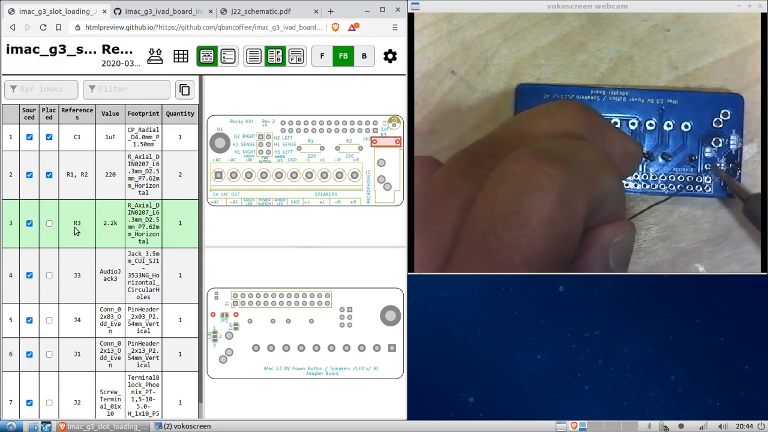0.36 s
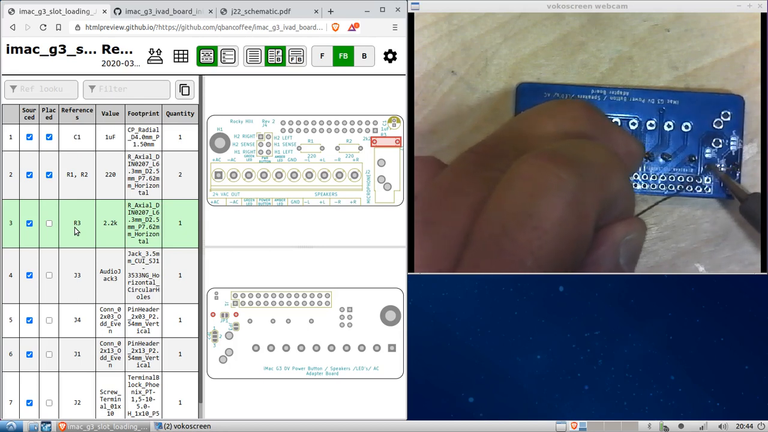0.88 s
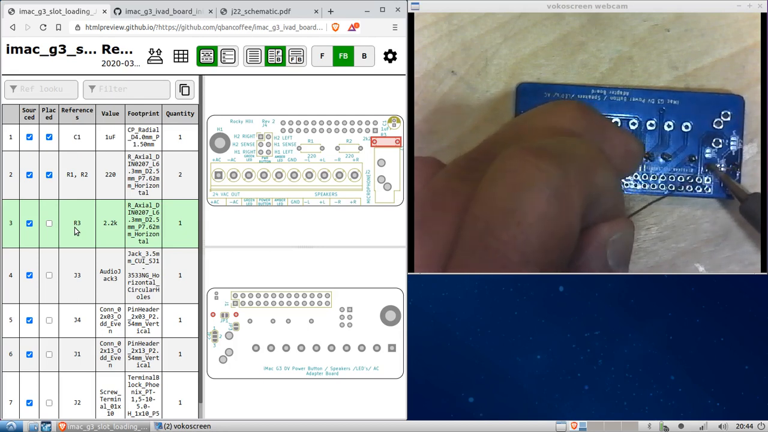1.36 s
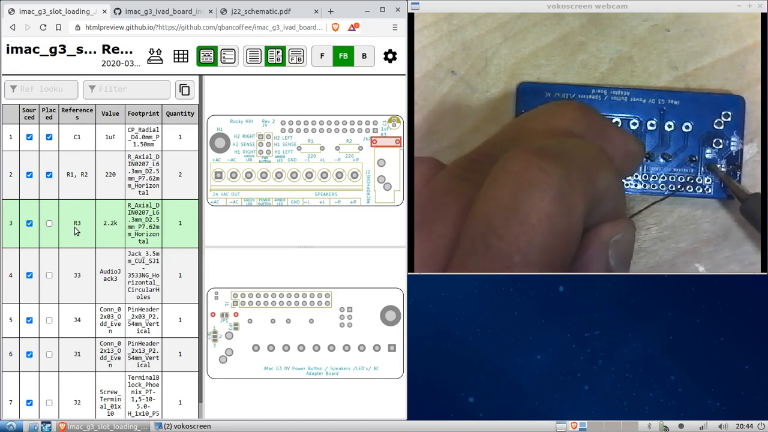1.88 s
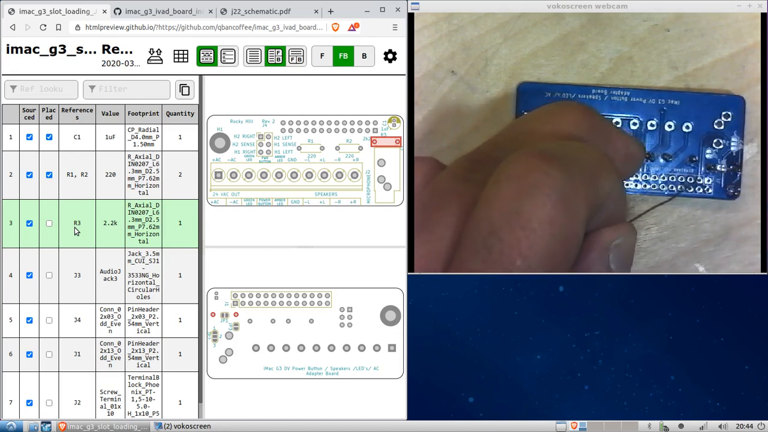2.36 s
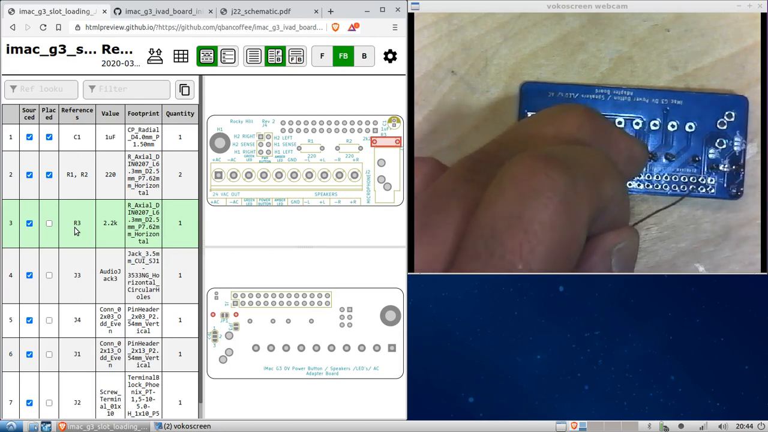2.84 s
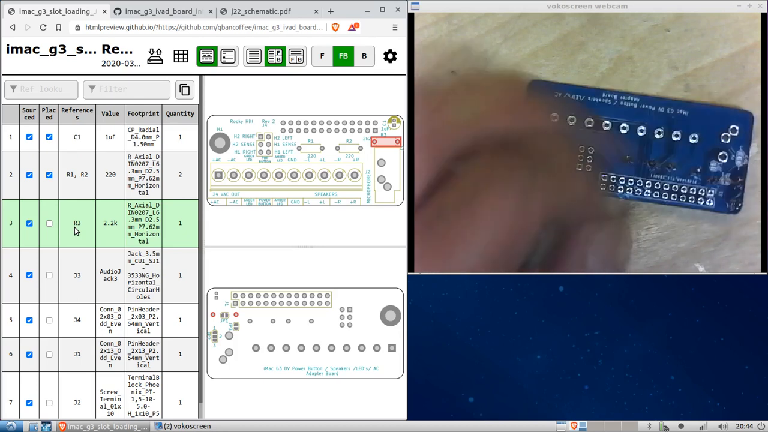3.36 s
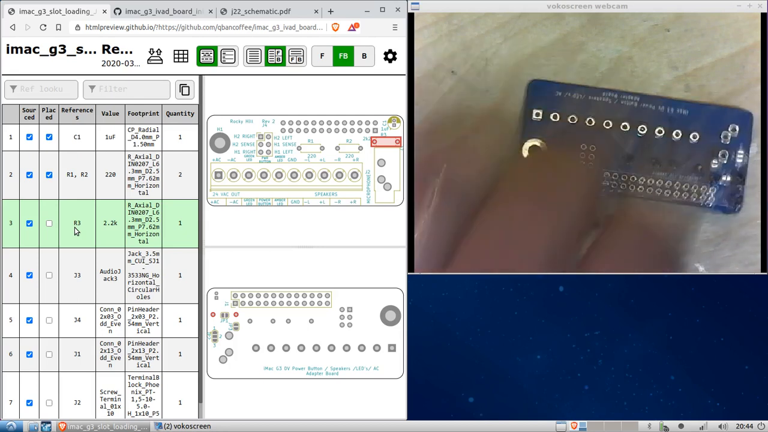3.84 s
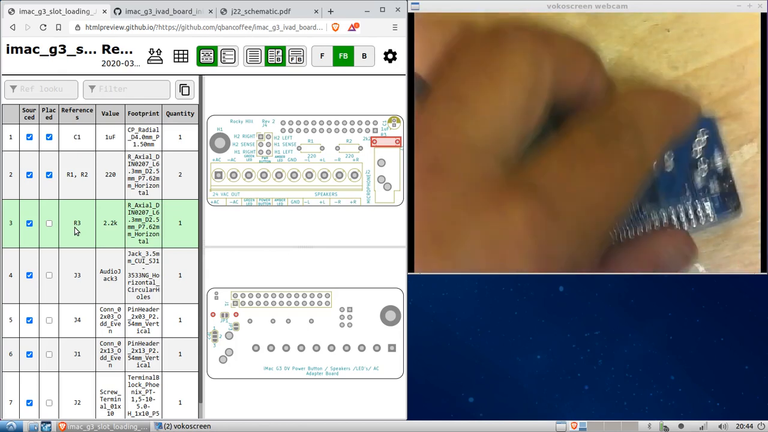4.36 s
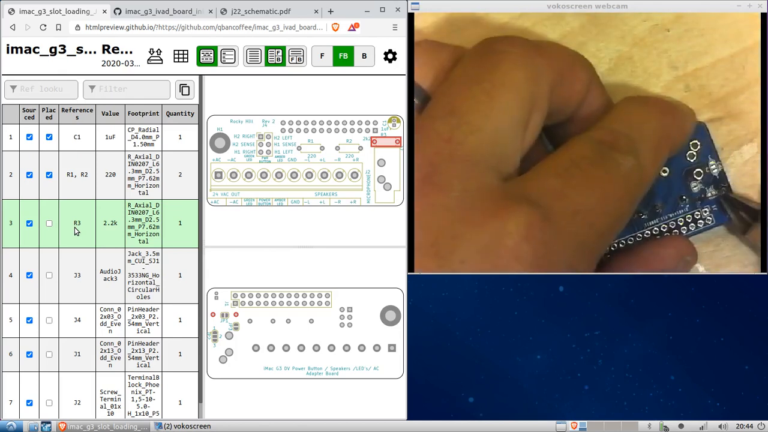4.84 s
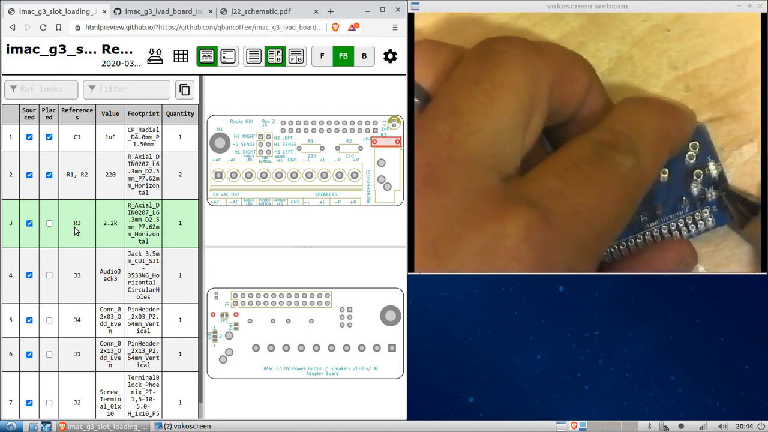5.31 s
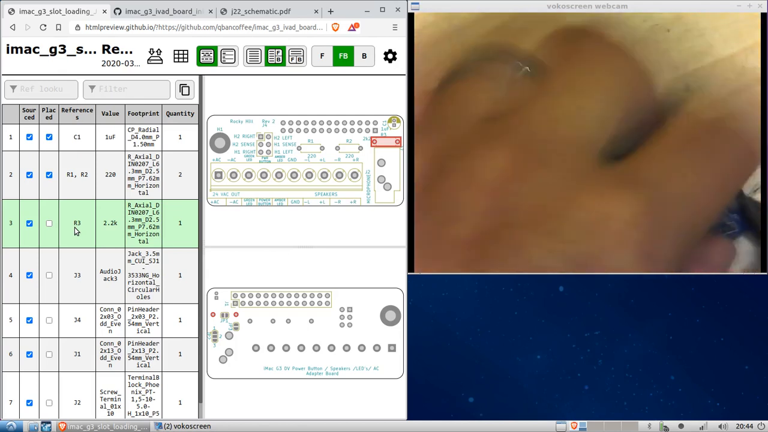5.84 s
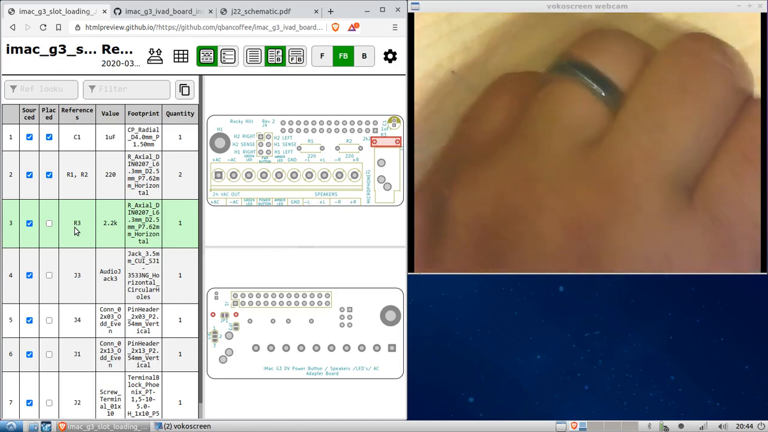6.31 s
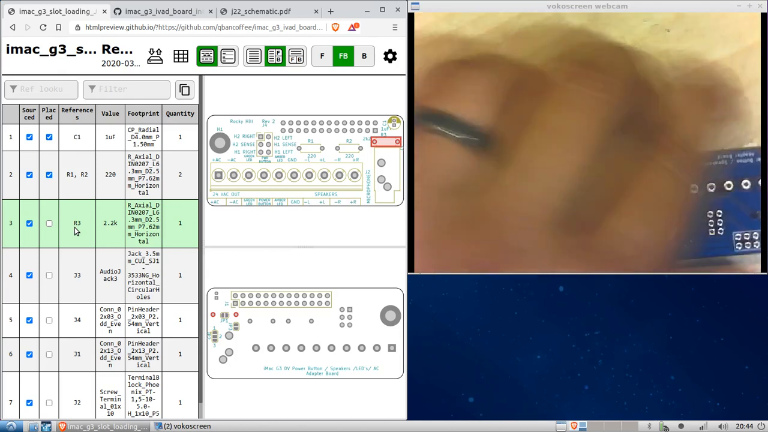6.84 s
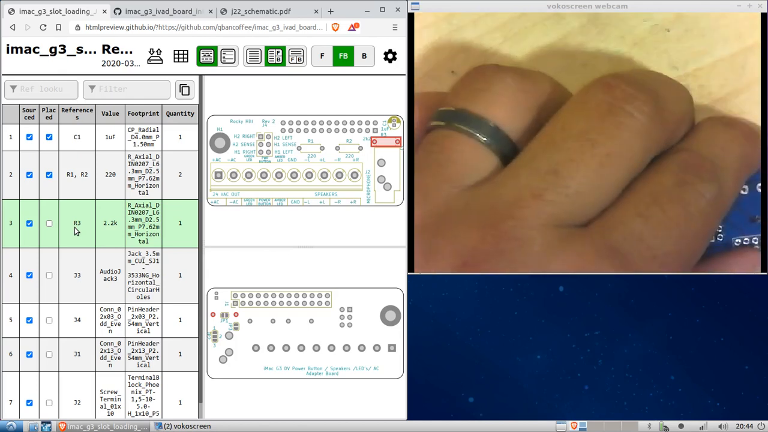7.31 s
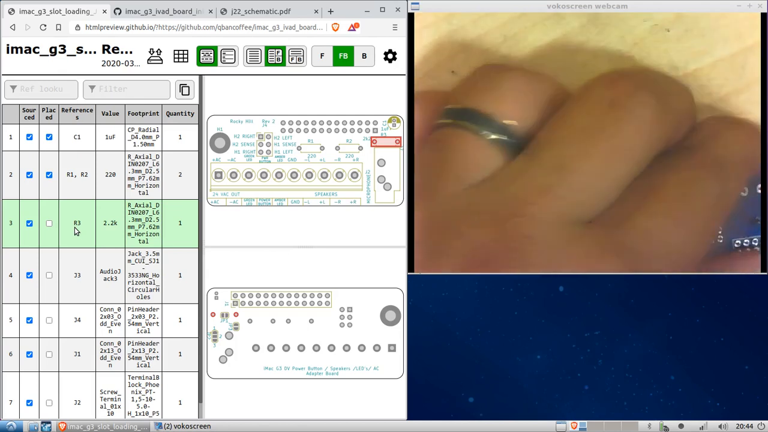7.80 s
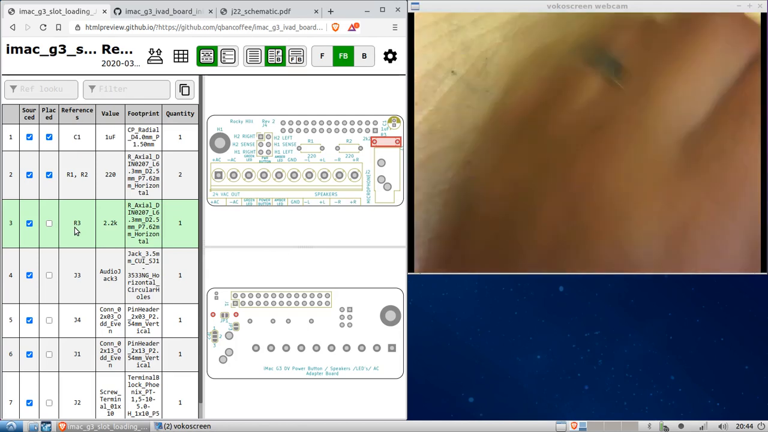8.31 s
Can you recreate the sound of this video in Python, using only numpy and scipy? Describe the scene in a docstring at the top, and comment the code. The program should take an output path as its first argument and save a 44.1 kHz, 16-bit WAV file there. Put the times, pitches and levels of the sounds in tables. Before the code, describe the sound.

Close up at a wooden workbench, small cutters trim leads from a circuit board. Mostly quiet hum and fan hiss, broken by a fast rattle of hard snaps and board knocks, a bright tick, and low bumps from the hands. Later come isolated sharp snips, a short ringing flurry, light rubbing and another crack. Dry small room, bright close microphones that clip on peaks.

```python
"""Small steel cutters snip wire leads on a circuit board: each contact is a burst of noise with knocks and thuds.
Short decaying tones make the clicks of the tips; swelling noise makes hands push and turn the board
on a wooden bench. Steady tones and noise make a mains hum and a fan; very low noise makes the bench sway.
The room is small. Two close microphones ring near 10 kHz and clip on the loudest snips."""
import sys
import numpy as np
from scipy import signal
from scipy.fft import rfft, irfft, next_fast_len
from scipy.io import wavfile
from scipy.ndimage import map_coordinates

SR = 44100
rng = np.random.default_rng(int(sys.argv[2]) if len(sys.argv) > 2 else 0)


def pcm_store(signal):
    """Save signal as 16-bit PCM."""
    levels = np.round(np.clip(np.atleast_2d(signal), -1, 1) * 32767)
    wavfile.write(sys.argv[1], SR, levels.astype(np.int16).T)


def level_to_linear(level):
    """Convert decibel levels to linear amplitude factors, elementwise."""
    exponent = np.asarray(level, float) / 20
    return 10 ** exponent


N = 371763  # length of the scene [samples]

# Slow rocking of the bench on its legs: (centre [Hz], width [Hz], relative level [dB])
SWAY_MODES = [(5.4, 0.24, -0.5), (9.7, 0.24, -13), (14.5, 2.1, -14)]
# Mains hum whose load switches on and off: (level on [dB], level off [dB], cycle [s], first switch-off [s])
HUM_LOAD = (-31.6, -34.8, 2.62, .37)
# Steady tones of the fan: (frequency [Hz], level [dB])
FAN_TONES = [(57.3, -68.5), (60, -50), (457, -58.5), (571, -59), (823, -59), (1012, -63.5), (1238, -65),
             (1519, -61), (4834, -78)]
# Colour of the fan noise: (frequency [Hz], relative level [dB])
FAN_AIR = [(15, -120), (25, 2), (50, -20.5), (100, -9), (200, -21), (350, -23.5), (600, -19.5), (1500, -25),
           (2500, -30), (6000, -33), (16000, -36.5)]
# How alike the fan noise is at left and right: (frequency [Hz], likeness [1 = same])
FAN_LIKENESS = [(60, 0.83), (250, 0.6), (600, 0.033), (1500, 0.36), (4000, 0.15), (12000, 0.27)]
# The same for things on the bench: (frequency [Hz], likeness [1 = same])
BENCH_LIKENESS = [(60, 0.99), (250, 0.98), (600, 0.92), (1500, 1), (4000, 0.23), (12000, 0.05)]
# Hands and board slide on the bench: (peak time [s], length [s], skin hiss [dB], board scrape [dB])
RUBS = [(2.02, 0.22, -41.5, -44), (2.81, 0.096, -15, -9.5), (3.2, 0.17, -43, -40), (3.295, 0.14, -36, -45),
        (3.43, 0.16, -31.5, -45), (3.48, .15, -41, -55), (3.734, 0.16, -35.5, -37.5),
        (3.874, 0.19, -40, -43.5), (3.93, 0.11, -44, -36), (4.06, 0.22, -44.5, -48),
        (4.174, 0.058, -45, -55), (5.19, 0.16, -58, -42.5), (5.29, 0.17, -33, -36),
        (5.558, 0.11, -47, -44.5), (6.2, 0.13, -60, -40), (6.25, 0.047, -45, -33), (6.279, 0.023, -33, -20),
        (6.52, 0.37, -37.5, -45), (6.742, 0.073, -47, -43), (6.82, 0.11, -41.5, -36),
        (6.97, 0.17, -55, -47), (7.674, 0.39, -37.5, -43), (7.8, 0.072, -73, -51), (8.1, 0.13, -49, -34.5),
        (8.17, 0.41, -38.5, -48), (8.25, 0.06, -44, -37), (8.335, 0.037, -61, -42)]
# Hands shake the bench: (peak time [s], length [s], level [dB])
BUMPS = [(2.8, 0.3, -21), (3.0, 0.33, -40.5), (3.216, 0.083, -36), (3.45, .2, -22), (3.75, 0.15, -24.5),
         (3.922, 0.13, -31.5), (6.03, .15, -28.5), (6.3, 0.32, -30), (6.46, .15, -47), (6.644, 0.32, -36.5),
         (6.954, .1, -36), (7.86, .2, -38)]
# The tips touch a lead or joint with one short click: (time [s], starting level [dB], pitch [Hz])
TICKS = [(0.715, -17, 6840), (.780, -19, 5350), (3.4337, -3.5, 8900), (4.171, -25, 8800),
         (4.868, -29, 2920), (6.129, -8.5, 9500), (6.181, -15, 9550), (8.339, -9, 5600)]
# Contacts of cutters, leads and board; each layer trims its level further:
# (time [s], snap [dB], knock over snap [dB], knock centre [Hz], bench thud over snap [dB])
CONTACTS = [(0.3057, -43, 9, 1090, 6), (1.796, -41.5, 1, 1080, -17), (1.9983, -34.5, 1, 1160, -23),
            (2.6838, -4, -4.5, 1220, -12), (2.745, 1, -1.5, 1170, -2.5), (2.7782, 0.5, 0, 1700, 0.5),
            (2.795, 1, 1.5, 1050, -16), (2.831, -5.5, -7, 1460, -28), (2.99, -25, 0, 1500, -20.5),
            (2.9977, -5, -11, 1520, -17), (3.0331, -2, -9.5, 2065, -17), (3.0838, -4.5, -11, 1130, -11),
            (3.2212, -32, -13, 501, -19), (3.3339, -37.5, 15.5, 920, 9), (3.4331, -24.5, -3, 1040, 0),
            (3.4564, -24, 0.5, 430, 7.5), (3.9156, -44, 10.5, 960, -14), (3.921, -43, 12.5, 510, -16),
            (4.7982, -48.5, 8, 720, 2), (4.8663, -41.5, 6.5, 910, 7), (5.279, -37, 11.5, 1130, -22),
            (5.718, -46, 7, 680, -15), (5.9948, 9, -28.5, 674, -38), (6.0345, -30, 5, 930, -28),
            (6.126, -30, 3, 820, -30), (6.1546, -36, 7, 509, -12), (6.2632, -15, -7, 900, -40),
            (6.2848, 9.5, -13, 2650, -22), (6.345, -7, -8, 930, -19), (6.3661, -9.5, 0, 2720, -24),
            (6.405, -8, -8, 952, -10.5), (6.8505, -29, -16, 452, -9), (7.7522, -46.5, 9, 1070, -16),
            (7.8469, 13, -32, 1500, -28), (8.0945, -34, 4, 1070, 6), (8.1276, -45.5, 1, 863, 15),
            (8.1648, -34.5, 0.5, 894, -21), (8.2474, -33, 5, 2150, 5)]
# Loose wire ends jingle after some contacts: (time [s], level [dB], centre [Hz])
JINGLES = [(3.033, -32, 12200), (3.085, -25.5, 7850), (3.469, -25, 12800), (6.284, -8.5, 9640),
           (6.365, -24, 8000)]
# Colour of snaps and skin hiss: (frequency [Hz], relative level [dB])
SNAP_COLOUR = [(150, -120), (400, -13.5), (1500, -7.5), (3500, 1), (6000, 3), (9000, 7), (10300, 5),
               (11200, -5), (13000, -6), (16000, -35)]
# Resonances of the circuit board: (centre [Hz], width [Hz], relative level [dB])
BOARD_MODES = [(347, 290, -0.5), (730, 400, -1), (900, 101, 4.5), (1130, 190, 0), (1460, 78, 1.5),
               (1810, 286, -0.5), (2440, 480, 0.5), (2850, 780, -3.5)]
# Resonances of the wooden bench: (centre [Hz], width [Hz], relative level [dB])
BENCH_MODES = [(36.7, 20, -2.5), (58, 14.4, -0.5), (104.6, 14.7, -1), (159.8, 12, 0.5), (241, 50, -5.5),
               (350, 43, -1), (523, 92, -3.5)]
# Resonances of the wire ends: (centre [Hz], width [Hz], relative level [dB])
WIRE_MODES = [(7860, 45, 17), (9200, 74, -20.5), (10390, 78, -10), (11800, 56, 0), (14000, 270, -16)]
# Resonance of the microphone inlet: (centre [Hz], width [Hz], level [dB])
INLET_MODES = [(9530, 740, 3)]


def unit(x):
    """Scales a sound to an average (rms) strength of 1."""
    return x / np.sqrt(np.mean(x ** 2) + 1e-20)


def along(points, hz):
    """Reads values between (Hz, value) points, with pitch on a log axis as we hear it."""
    f, v = np.transpose(points)
    return np.interp(np.log(hz + 1), np.log(f + 1), v)


def wobble(rate):
    """A smooth random curve with this many random points a second."""
    points = rng.standard_normal(int(N * rate / SR) + 4)
    return map_coordinates(points, [np.arange(N) * rate / SR])


def filtered(x, response):
    """Passes a full-length sound through a filter given as a response over frequency."""
    m = next_fast_len(N + SR // 2)  # spare room keeps the end from wrapping to the start
    return irfft(rfft(x, m) * response(np.fft.rfftfreq(m, 1 / SR)), m)[..., :N]


def resonances(modes):
    """A body that rings at a few frequencies; wider modes die away sooner."""
    def response(f):
        total = 0
        for k, (centre, width, db) in enumerate(modes):
            peak = 1j * f * width / (centre * centre - f * f + 1j * f * width)
            total = total + (-1) ** k * level_to_linear(db) * peak  # neighbours have opposite signs
        return total
    return response


def around(modes, hz, octaves):
    """Modes near the struck spot's centre frequency answer most; each is 6 dB weaker this many octaves away."""
    return resonances([(c, w, db - 6 * (np.log2(c / hz) / octaves) ** 2) for c, w, db in modes])


def spectrum(points):
    """A smooth tone colour drawn through (Hz, dB) points."""
    return lambda hz: level_to_linear(along(points, hz))


def coloured(envelope, response, alike=BENCH_LIKENESS):
    """Noise shaped in time, then coloured at equal overall strength; partly alike in both ears."""
    size = np.shape(envelope)[-1]
    m = next_fast_len(size + SR // 4)
    hz = np.fft.rfftfreq(m, 1 / SR)
    colour = response(hz) / np.sqrt(np.mean(np.abs(response(hz)) ** 2))
    # share the noise between the middle (same in both ears) and the sides (opposite)
    turn = np.arccos(np.clip(along(alike, hz), -1, 1)) / 2
    gain = colour * [np.cos(turn), np.sin(turn)]
    noise = envelope * rng.standard_normal((2, size))
    mid, side = irfft(rfft(noise, m) * gain, m)[:, :size]
    return np.array([mid + side, mid - side])


def dying(db, early_t60, room_db, room_t60, crack_db=-60):
    """A crack, a burst of direct sound and near echoes, then the room's tail; lumpy with single echoes."""
    t = np.arange(SR // 2) / SR
    crack = level_to_linear(crack_db - 60 * t / 0.0067)  # T60 is the time [s] to fall by 60 dB
    burst = level_to_linear(-60 * t / max(early_t60, .004))
    room = level_to_linear(room_db - 60 * t / room_t60)
    lumps = np.interp(t, np.arange(200) / 400, rng.standard_normal(200))
    return level_to_linear(db + 1.53 * lumps * (t > .002)) * np.linalg.norm([crack, burst, room], axis=0)


def strokes(rows):
    """Each stroke swells to its peak and fades again; one envelope for each level column."""
    t = np.arange(N) / SR
    total = 0
    for peak_s, length, *levels in rows:
        shape = level_to_linear(-18.5 * np.abs(t - peak_s) / (length / 2))  # both ends lie 18.5 dB down
        total = total + level_to_linear(np.array(levels))[:, None] * shape
    return total


def add(track, s, sound):
    """Mixes a short sound in at its time."""
    track[:, round(s * SR):][:, :sound.shape[1]] += sound


def sway():
    """The bench rocks slowly: noise through its slow resonances, mostly too low to hear."""
    rocking = lambda f: resonances(SWAY_MODES)(f) / (1 + (f / 20) ** 4)
    return level_to_linear(-27.0) * unit(filtered(rng.standard_normal(N), rocking))


def mains_hum():
    """A low tone steps between two levels as its load switches; an overtone twice as high slowly fades."""
    t = np.arange(N) / SR
    on_db, off_db, cycle, first_off = HUM_LOAD
    load = np.clip(.5 - 6 * np.sin(2 * np.pi * (t - first_off) / cycle), 0, 1)  # 1 = on, 0 = off
    hum_db = off_db + (on_db - off_db) * load + 0.43 * wobble(21)
    hum = level_to_linear(hum_db) * np.sin(2 * np.pi * 119.9 * t)
    buzz_db = -56 - 0.9 * t + 0.43 * wobble(25)
    buzz = level_to_linear(buzz_db) * np.sin(2 * np.pi * 239.8 * t)
    return np.sqrt(2) * (hum + buzz)  # the root of 2 makes the levels rms levels


def fan():
    """Tones a little unsteady in level and pitch, over a soft rush of noise."""
    t = np.arange(N) / SR
    tones = 0
    for hz, db in FAN_TONES:
        level = level_to_linear(db + 0.83 * wobble(7.1))
        tones = tones + level * np.sin(2 * np.pi * hz * t + 1.2 * wobble(7.4))
    rush = coloured(level_to_linear(-41.0 + 0.19 * wobble(1.12)), spectrum(FAN_AIR), FAN_LIKENESS)
    return np.sqrt(2) * tones + rush


def hands():
    """Sliding skin and board: uneven grains of friction into air and board; pushes rumble in the bench."""
    hiss, scrape = strokes(RUBS)
    rumble, = strokes(BUMPS)
    grain = unit(level_to_linear(1.3 * wobble(150) + 1.1 * wobble(400)))
    skin = coloured(hiss * grain, spectrum(SNAP_COLOUR))
    board = coloured(scrape * grain, resonances(BOARD_MODES))
    return skin + board + coloured(rumble, around(BENCH_MODES, 56.5, 1.0))


def ticks():
    """A few cycles of a stiff contact, then its faint answer from the room."""
    track, t = np.zeros((2, N + SR)), np.arange(SR // 2) / SR
    for s, db, hz in TICKS:
        age = np.maximum(t - [[0], [.0001]], 0)  # the right side starts 0.0001 s later
        click = level_to_linear(db - 60 * age * hz / 17) * np.sin(2 * np.pi * hz * age)  # falls 60 dB in 17 cycles
        add(track, s, click)
        colour = lambda f: level_to_linear(along(SNAP_COLOUR, f)) / np.hypot(1, 1.9 * np.log2((f + 1) / hz))
        add(track, s + 0.0023, coloured(dying(db - 19.5, 0.048, -6.0, 0.42), colour))
    return track[:, :N]


def rap(db, hz):
    """The struck spot swings a few clean cycles, strongest after two, the same in both ears."""
    cycles = np.arange(SR // 20) / SR * hz
    swell = (cycles / 2 * np.exp(1 - cycles / 2)) ** 2
    return level_to_linear(db) * swell * np.sin(2 * np.pi * cycles) * np.ones((2, 1))


def contacts():
    """Each contact snaps, knocks the board and thuds the bench; some leave wire ends jingling."""
    track = np.zeros((2, N + SR))
    for s, db, knock_db, hz, thud_db in CONTACTS:
        t60 = 0.014 * 2 ** (-db / 48)  # harder contacts are shorter: half as long for 48 dB more
        snap = dying(db - 3.0, t60, -7, 0.25, crack_db=-5.0)
        add(track, s, coloured(snap, spectrum(SNAP_COLOUR)))
        rattle = dying(db + knock_db - 0.5, 0.81 * t60, -5.5, 0.26)
        add(track, s, coloured(rattle, around(BOARD_MODES, hz, 0.95)))
        add(track, s, rap(db + knock_db + 5.5, hz))  # first rap of the knock
        thud = dying(db + thud_db - 9.5, 0.021, -1.5, 0.29)
        add(track, s, coloured(thud, around(BENCH_MODES, 255, 0.99)))
    for s, db, hz in JINGLES:
        add(track, s, coloured(dying(db, 0.09, 5.4, 0.18), around(WIRE_MODES, hz, 0.12)))
    return track[:, :N]


def scene():
    """All sources at the bench, added together in the air."""
    return sway() + mains_hum() + fan() + hands() + ticks() + contacts()


def band_limit(x):
    """A steep low-pass at the top of the band."""
    return signal.sosfilt(signal.butter(12, 15610, fs=SR, output="sos"), x)


def record(dry):
    """The microphone inlets ring, the left one hears slightly later, and loud peaks are cut off flat."""
    left_lag_s = 0.00011
    lag = lambda hz: np.exp(-2j * np.pi * hz * left_lag_s * np.array([[1], [0]]))
    mic = filtered(dry, lambda hz: (1 + resonances(INLET_MODES)(hz)) * lag(hz))
    return band_limit(np.clip(mic, -1, 1))


dry = scene()
out = record(dry)
pcm_store(out)
```